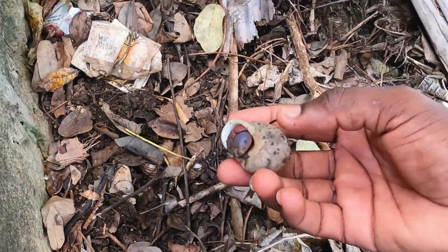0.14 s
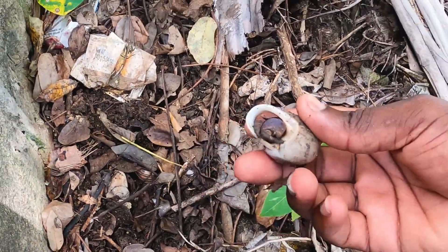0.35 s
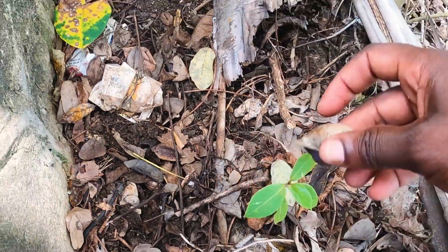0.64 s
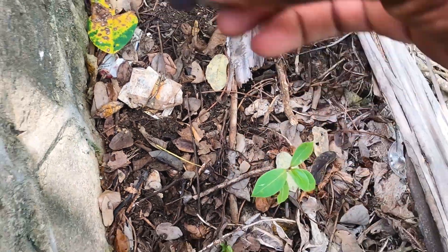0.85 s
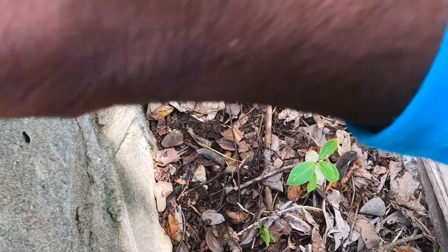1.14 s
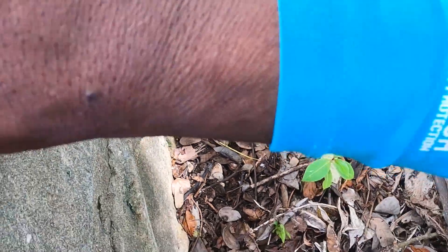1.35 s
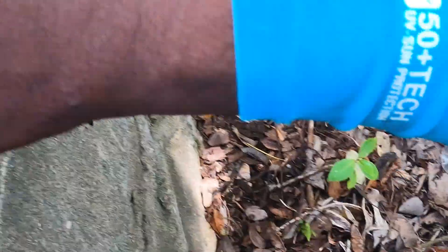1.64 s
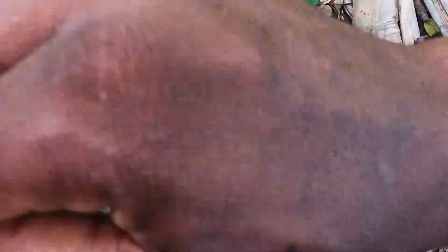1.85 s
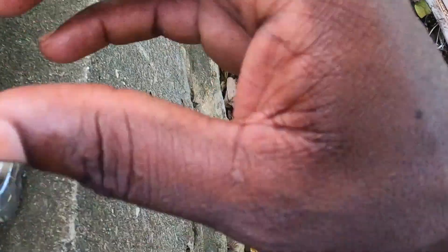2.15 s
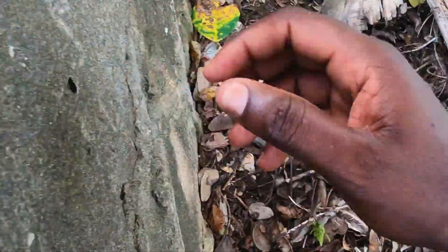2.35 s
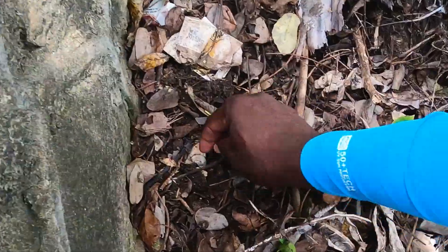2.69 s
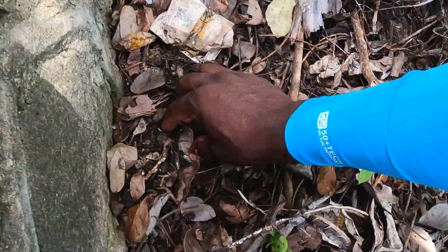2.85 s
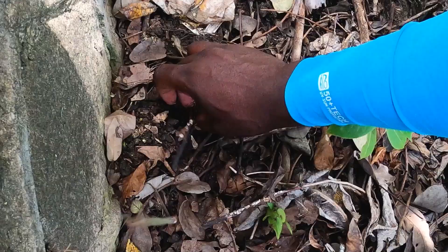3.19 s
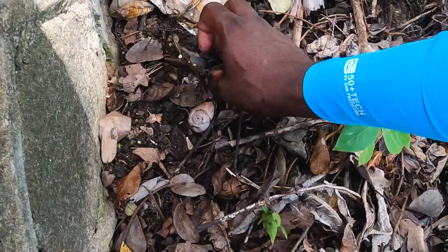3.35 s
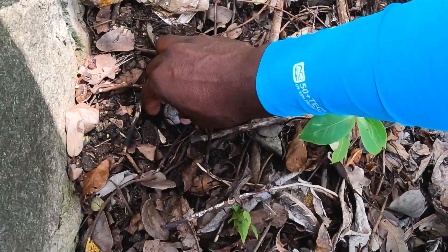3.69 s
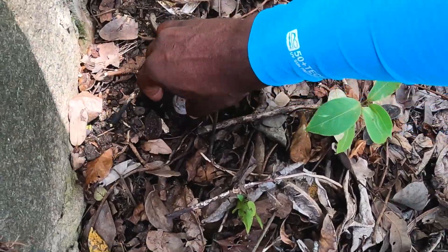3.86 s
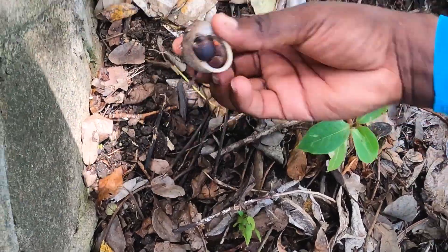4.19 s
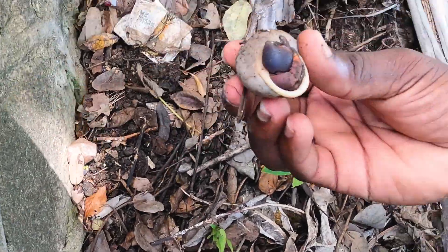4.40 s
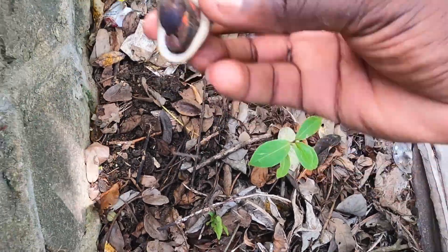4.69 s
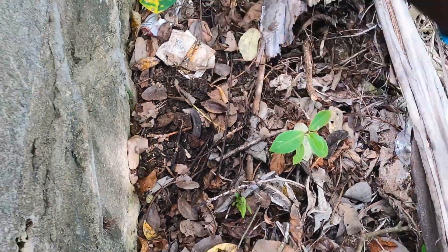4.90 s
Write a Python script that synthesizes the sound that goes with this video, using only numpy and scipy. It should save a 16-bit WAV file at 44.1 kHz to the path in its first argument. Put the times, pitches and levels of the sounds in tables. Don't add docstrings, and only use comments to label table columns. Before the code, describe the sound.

Outdoors beside a rock, a hand faintly rustles and snaps dry leaves over low distant surf. After about a second, shells clatter hard in a tipped plastic bottle, with bright ticks, scraping and hollow knocks. It is set down, then carried, giving soft paired hollow knocks among leaf crackles. Close handheld microphone; loud hits briefly push the background down.

```python
import sys
import numpy as np
from scipy import signal
from scipy.fft import rfft, irfft, next_fast_len
from scipy.io import wavfile
from scipy.ndimage import uniform_filter1d

SR = 44100
rng = np.random.default_rng(int(sys.argv[2]) if len(sys.argv) > 2 else 0)


def gain_from_db(level_db):
    decades = np.asarray(level_db, float) / 20
    return 10 ** decades


def wav_record(signal):
    frames = np.transpose(np.atleast_2d(signal))
    bounded = np.clip(frames, -1, 1)
    quanta = np.round(bounded * 32767).astype(np.int16)
    wavfile.write(sys.argv[1], SR, quanta)


N = 221955
UPRIGHT_S, SET_DOWN_S = 2.02, 2.3


def unit(x):
    return x / np.sqrt(np.mean(x ** 2))


def highpass(x, order, hz):
    return signal.sosfilt(signal.butter(order, hz, "high", fs=SR, output="sos"), x)


def strikes(s, size):
    at = np.clip((s * SR).astype(int), 0, N - 1)
    return np.bincount(at, size, N)


def mode(x, hz, t60):
    fade = np.exp(-np.log(1000) / (max(t60, 0.002) * SR))
    turn = 2 * np.pi * hz / SR
    return signal.lfilter([0, np.sin(turn)], [1, -2 * fade * np.cos(turn), fade ** 2], x)


def bands(x, peaks):
    out = 0
    for k, (hz, width, db) in enumerate(peaks):
        out = out + (-1) ** k * gain_from_db(db) * signal.lfilter(*signal.iirpeak(hz, hz / width, SR), x)
    return out


def walk(rate):
    k = int(SR / rate)
    held = np.repeat(rng.standard_normal(N // k + 1), k)
    return 1.33 * uniform_filter1d(held, k)[:N]


def grains(rate, spread_db):
    hit = rng.random(N) < rate / SR
    return unit(hit * rng.standard_normal(N) * gain_from_db(spread_db * rng.exponential(size=N)))


def smear(s, db, width_s):
    return np.maximum(uniform_filter1d(strikes(s, gain_from_db(db)), int(width_s * SR)), 0)


def strokes(table):
    s, db, rise_s, fall_s = np.transpose(table)[:, :, None]
    age = np.arange(N) / SR - s
    down_db = 20 * np.where(age < 0, -age / rise_s, age / fall_s)
    return gain_from_db(db - down_db).max(axis=0)


# f/Hz, level/dB [per Hz]
SURF_SPECTRUM = [(20, -13), (75, 0), (95, -4), (118, 0), (160, -11.5), (280, -14), (360, -22.5),
                 (600, -20.5), (1000, -22.5), (2200, -35.5), (8000, -41.5), (16000, -46)]


def surf():
    size = next_fast_len(N, True)
    f = np.maximum(np.fft.rfftfreq(size, 1 / SR), 1)
    hz, db = np.transpose(SURF_SPECTRUM)
    wave = rfft(rng.standard_normal(size)) * gain_from_db(np.interp(np.log(f), np.log(hz), db))
    octave = np.floor(np.log2(np.clip(f, 30, 1100)))
    out = 0
    for k in np.unique(octave):
        out = out + irfft(wave * (octave == k), size)[:N] * gain_from_db(0.92 * walk(6))
    bass = irfft(wave * (f > 30) * (f < 160), size)
    return out / np.std(bass)


def duck(hits):
    wake_db, pull, recovery_s = -17.5, 1200.0, 0.33
    keep = np.exp(-1 / (recovery_s * SR))
    over = np.maximum(np.abs(hits) - gain_from_db(wake_db), 0)
    return 1 / (1 + pull * signal.lfilter([1 - keep], [1, -keep], over))


# f/Hz, width/Hz, level/dB
CRACKLE_BANDS = [(7000, 4000, -8), (12000, 4000, -2), (15000, 3000, 0)]


def crackle():
    keep = np.exp(-1 / (0.0025 * SR))
    puffs = signal.lfilter([1], [1, -keep], np.abs(grains(70, 3.0)))
    return unit(bands(puffs * rng.standard_normal(N), CRACKLE_BANDS))


# t/s, level/dB, rise/s, fall/s [each for 20 dB]
BRUSHES = [(.04, -60.5, 0.069, 0.25), (1.013, -60.5, 0.21, 0.36), (1.352, -65, 0.048, 0.18),
           (1.6, -58, .2, .2), (1.756, -42, 0.083, 0.028), (1.836, -57, .1, 0.11),
           (1.952, -34.5, 0.026, 0.021), (2.054, -46, .04, 0.042), (2.699, -51.5, .1, .17),
           (2.854, -51.5, .1, 0.25), (3.043, -48.5, 0.13, 0.15), (3.457, -54.5, 0.43, .11),
           (4.041, -59, 0.062, 0.11)]


def brushing():
    return gain_from_db(-76) + strokes(BRUSHES)


# f/Hz, width/Hz, level/dB
RUSTLE_BANDS = [(3820, 2100, -3), (7500, 5100, -5), (11000, 3400, -2.5), (14000, 1900, -9)]


def rustle(leaves):
    flicker = gain_from_db(-3.5 + 1.94 * walk(40))
    return leaves * flicker * unit(bands(grains(5000, 2.4), RUSTLE_BANDS))


# t/s, level/dB
THUMPS = [
    (1.312, -33.5),
    (2.051, -37),
]
THUMP_MODES = (70.5, 193)


def thumps():
    s, db = np.transpose(THUMPS)
    push = uniform_filter1d(strikes(s, gain_from_db(db)), 60)
    return sum(mode(push, hz, 0.07) for hz in THUMP_MODES)


# t/s, level/dB, f/Hz, t60/s
PINGS = [(.425, -44, 15200, .008), (0.712, -38, 850, 0.022), (.755, -45, 2000, .015),
         (.845, -42, 1950, 0.016), (1.286, -50, 2000, .012), (1.362, -38, 5700, .03),
         (1.576, -16, 797, .035), (2.682, -18, 14000, .006), (2.683, -33, 1620, 0.022),
         (3.025, -32, 14500, .008), (3.456, -32, 1090, 0.022), (3.97, -38.5, 2300, .02),
         (4.149, -37, 2200, .015)]


def pings():
    out = 0
    for s, db, hz, t60 in PINGS:
        strike = strikes(np.array([s]), gain_from_db([db - 4.5]))
        for apart in (0.95, 1.06):
            out = out + mode(strike, hz * apart, t60)
    return out


# f/Hz, width/Hz, level/dB
SLIDE_BANDS = [(383.4, 117, -0.5), (627, 206, 0), (1235, 402, -7)]


def slide():
    s, low_db = np.transpose(TIPPED + CARRIED)[:2]
    shift_db = 0.7 * (low_db + 26.5) - 23.5 + np.where(s > SET_DOWN_S, 41, 36)
    settle_s, settle_db = 0.1, -13
    shift = smear(s + 0.009, shift_db, 0.03)
    shift = shift + smear(s + settle_s / 2, shift_db + settle_db, settle_s)
    return shift * gain_from_db(4.04 * walk(40)) * unit(bands(grains(2300, 2.37), SLIDE_BANDS))


# t/s, level/dB, rise/s, fall/s [each for 20 dB]
GRINDS = [
    (1.37, -57, 0.07, .08),
    (1.445, -63, .05, .1),
    (1.68, -62, .1, .06),
    (1.86, -56, .08, .07),
    (1.96, -45, .04, 0.052),
    (2.14, -56, 0.12, 0.04),
]


def scrape():
    s, db = np.transpose(CLASHES)[:2]
    rub = smear(s + 0.004, 0.38 * (db + 12) - 31.5 + 27, 0.03)
    rough = unit(bands(grains(6000, 4.34), DULL_BANDS + BRIGHT_BANDS[:1]))
    return (rub + strokes(GRINDS)) * gain_from_db(5.0 * walk(60)) * rough


# f/Hz, width/Hz, level/dB
DULL_BANDS = [(3520, 730, 0), (4216, 490, 3.5), (4890, 1280, -1.5), (6370, 1000, -12)]
# f/Hz, width/Hz, level/dB
BRIGHT_BANDS = [(8340, 6100, -4.5), (11720, 1200, 1.5), (12400, 11000, -11)]
# t/s, peak level/dB, brightness/dB, length/ms
CLASHES = [(1.303, -34.5, -2, 2.5), (1.3303, -27.5, -2, 1.6), (1.3481, -38, -1, 2), (1.3598, -40, -1, 6.6),
           (1.3676, -36, 10, 2.1), (1.3953, -35, -6, 1.3), (1.449, -48.5, 1, 4.4), (1.5543, -31, -8, 3.5),
           (1.5745, -20, 2, 3.1), (1.6111, -28.5, -5, 2.3), (1.676, -44, -12, 7.3),
           (1.7041, -1, -2.5, 1.26), (1.7445, -19.5, 2, 2.3), (1.7632, -30, -10, 1.9),
           (1.8189, -29, -10, 1.6), (1.8294, -43, -10, 6), (1.9402, -27, 12, 0.88),
           (1.9441, -21.5, -2.5, 0.89), (1.9616, -18, -7.5, 2), (1.9766, -30.5, -20, 2),
           (2.0421, -22.5, 3.5, 1.6), (2.0534, -12.5, -13, 2.25), (2.0873, -39, 5, 2.7),
           (2.1258, -24.5, -4.5, 2.1), (2.2324, -29, -14, 2), (2.29, -48, 15.5, 3.3)]
# t/s, peak level/dB, brightness/dB, length/ms
SNAPS = [(0.0384, -40.5, 0, 1.5), (0.2191, -53.5, 11, 3.8), (0.4253, -45, 14, 0.55), (0.559, -51, 12, 1.1),
         (0.711, -43.5, 3, 2.2), (0.7556, -43.5, -1, 0.93), (0.7793, -36, -6, 0.89), (0.834, -43, 4, 0.87),
         (0.93, -50, 14, 1.8), (1.0266, -51, 1, 4.4), (2.39, -51, 3, 0.8), (2.4216, -46, 8, 1.8),
         (2.485, -52, 14, 4), (2.5398, -37, 17, 2.9), (2.6812, -22.5, 6.5, 1.65), (2.723, -47, 19, 7.1),
         (2.828, -39, 9, 0.98), (2.8885, -41, -5, 1.1), (3.026, -37.5, 15, 1.9), (3.2192, -43.5, 4, 3.2),
         (3.254, -50, 9, 2.8), (3.277, -26.5, -4, 0.71), (3.3972, -45, 10, 2.2), (3.442, -38, 6, 0.91),
         (3.4653, -41.5, 2, 5.6), (3.6559, -46.5, 5, 4.9), (3.7683, -46, -2, 5.2), (4.025, -48, 21, 7.1),
         (4.4057, -43.5, -2, 1.1), (4.786, -46.5, -4, 4.8)]


def ticks():
    rims = [(s - 0.0015, db - 16 + 0.3 * high_db, -15, 3.6) for s, db, high_db in TIPPED + CARRIED]
    s, db, bright_db, ms = np.transpose(CLASHES + SNAPS + rims)
    age = np.arange(1400)
    shape = np.minimum(age / 1.3, 1) * gain_from_db(-10 * age / (1.38 * ms[:, None] * SR / 1000))
    at = np.clip((s[:, None] * SR).astype(int) + age, 0, N - 1).ravel()
    dull = 1 / (1 + gain_from_db(bright_db) ** 2)
    out = 0
    for part, peaks in ((dull, DULL_BANDS), (1 - dull, BRIGHT_BANDS)):
        burst = (gain_from_db(db - 2.5) * np.sqrt(part))[:, None] * shape
        swell = np.sqrt(np.bincount(at, burst.ravel() ** 2, N))
        noise = rng.standard_normal(N)
        out = out + bands(swell * noise, peaks) / np.std(bands(noise, peaks))
    return out


# t/s, low ring level/dB, upper modes over it/dB
TIPPED = [(0.7112, -48.5, 1), (1.3019, -29, 1), (1.3153, -28, -0.5), (1.342, -22.5, -5.5),
          (1.3726, -16, -10), (1.3943, -16.5, -2.5), (1.4424, -28.5, -13), (1.4638, -33, -9),
          (1.4892, -36, -4.5), (1.5575, -35.5, 1), (1.5744, -19, -1.5), (1.614, -34.5, 6.5),
          (1.6483, -30, -3.5), (1.6766, -29, -5), (1.7061, -28.5, 12), (1.7442, -23.5, 1), (1.796, -35, 2),
          (1.837, -37, -1), (1.94, -20.5, 0.5), (1.9611, -20, 2), (1.9976, -30.5, 2.5),
          (2.042, -14.5, -7.5), (2.0514, -12.5, 1.5), (2.0724, -26, -4), (2.1258, -19.5, -5.5),
          (2.1493, -23.5, -12.5), (2.1692, -45, -1), (2.1973, -30.5, -3), (2.2346, -14.5, -9),
          (2.266, -29, -6)]
# t/s, low ring level/dB, upper modes over it/dB
CARRIED = [(2.5711, -28, -10.5), (2.5904, -34, -18), (2.6824, -51.5, 17), (2.8334, -26, -13.5),
           (2.8518, -19, -13), (2.9596, -40, -14), (3.0568, -25.5, -6), (3.0804, -21.5, -15),
           (3.105, -23, -13.5), (3.147, -38.5, -18), (3.2761, -27.5, -7), (3.2922, -21, -6.5),
           (3.4555, -37.5, -1.5), (3.478, -32, -8), (3.668, -27, -12.5), (3.689, -20, -12),
           (3.8358, -37, -10), (3.8647, -33.5, -10), (3.9726, -30.5, -5.5), (3.99, -28, -8.5),
           (4.1515, -25.5, -8), (4.1689, -18, -7.5), (4.249, -39.5, -26), (4.3093, -35, -13),
           (4.4537, -28, -14), (4.5376, -22, -12), (4.666, -29.5, -16), (4.6775, -32, -25),
           (4.7994, -27.5, -20), (4.866, -35.5, -18)]
# t/s, low ring level/dB
SHIFTS = [(0.752, -60), (1.4764, -38), (1.688, -28.5), (1.871, -37), (2.0268, -32), (2.1089, -23),
          (2.358, -47), (2.398, -45.5), (2.502, -49.5), (2.5491, -40), (2.6671, -41), (2.8733, -29.5),
          (3.607, -47), (3.9393, -37), (4.107, -41), (4.214, -38), (4.29, -43), (4.5279, -31),
          (4.6178, -36), (4.7435, -38.5), (4.7626, -37), (4.8112, -40), (4.8501, -35.5), (4.8945, -43.5),
          (4.92, -43), (5.0, -43)]


def knocks(count=2):
    shifts = [(*row, -9.5) for row in SHIFTS]
    s, low_db, high_db = np.transpose(TIPPED + CARRIED + shifts)
    chance = rng.standard_normal((len(s), 3, count + 1))
    turn = np.arange(count + 1)
    when = s[:, None] + 0.013 * turn * np.exp(0.3 * chance[:, 0])
    low_db = low_db[:, None] - 14.5 * np.sqrt(turn) + 1.5 * chance[:, 1] * (turn > 0)
    air_db = -5.0 - 6.5 * (when < SET_DOWN_S) + (0.66 - 1) * (low_db + 28) + 2.2 * chance[:, 2]
    return when.ravel(), low_db.ravel(), np.repeat(high_db, count + 1), air_db.ravel()


# f/Hz, level/dB, t60/s, stance [0 tipped, 1 upright]
AIR_NOTE = [(335.8, -1.5, 0.15, 0), (372.4, -5.5, 0.12, 1), (394, -4.5, 0.085, 1)]
# f/Hz, level/dB, t60/s
LOW_WALL = [(210.4, -15.5, 0.046), (447.6, 0.5, 0.029), (618.4, 0, 0.026), (682, -8, 0.041),
            (799, -6, 0.013)]
# f/Hz, level/dB, t60/s
HIGH_WALL = [(935, -12, 0.03), (1206, -6, .035), (1328, 5.5, 0.012), (1537, -5.5, 0.02), (1770, 0, 0.0065),
             (2435, -9.5, 0.011), (3000, -16.5, 0.011)]


def bottle(count=6):
    s, low_db, high_db, air_db = knocks()
    scatter = 0.3 * rng.standard_normal((len(s), count))
    when = s[:, None] + (np.arange(count) - 3 + scatter) * 0.002154
    weight = np.array([0.12, 0.15, 0.27, 0.99, 0.61, 0.34])
    # mode, push in dB, knocks that sound it
    modes = [(m[:3], low_db + 0.9 * air_db, (s >= UPRIGHT_S) == round(m[3])) for m in AIR_NOTE]
    modes += [(m, low_db - 3.0, 1) for m in LOW_WALL]
    modes += [(m, low_db + high_db - 2.5, 1) for m in HIGH_WALL[:5]]
    modes += [(m, low_db + high_db, s > SET_DOWN_S) for m in HIGH_WALL[5:]]
    chance = rng.standard_normal((len(s), len(modes), count))
    out = 0
    for k, ((hz, db, t60), push_db, on) in enumerate(modes):
        share = np.sign(chance[:, k]) * (0.99 + 0.5 * np.abs(chance[:, k]))
        size = (on * gain_from_db(push_db + db))[:, None] * weight * share
        push = uniform_filter1d(strikes(when.ravel(), size.ravel()), int(0.4 * SR / hz) + 1)
        out = out + mode(push, hz, t60)
    return out


def rock_echo(hits):
    age = np.arange(4000)
    rock = rng.standard_normal(len(age)) * gain_from_db(-60 * age / SR / 0.05) * (age > 90)
    return gain_from_db(-39) * signal.oaconvolve(hits, rock)[:N]


def scene():
    leaves = brushing()
    body = highpass(bottle() + slide(), 6, 215)
    edges = highpass(ticks() + scrape(), 3, 2900)
    hits = body + edges + pings()
    background = gain_from_db(-46.5) * surf() + leaves ** 0.58 * gain_from_db(-36) * crackle()
    mix = hits + rock_echo(hits) + thumps() + rustle(leaves) + duck(hits) * background
    return mix[None]


def low_pass(x):
    return signal.sosfilt(signal.butter(12, 16820, fs=SR, output="sos"), x)


def record(dry):
    soft = np.tanh(1.6 * dry) / 1.6
    cut = signal.sosfilt(signal.cheby2(10, 28, 15950, fs=SR, output="sos"), soft)
    return low_pass(cut)


dry = scene()
out = record(dry)
wav_record(out)
```